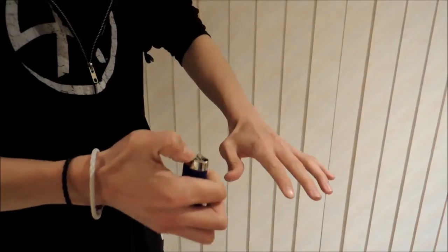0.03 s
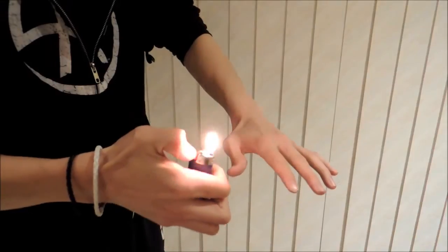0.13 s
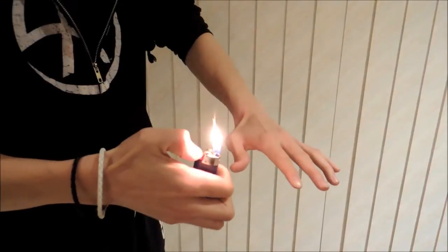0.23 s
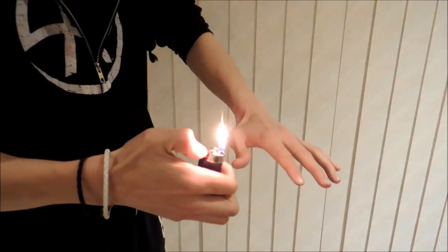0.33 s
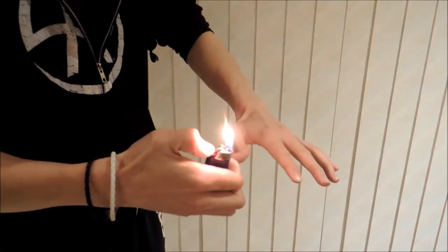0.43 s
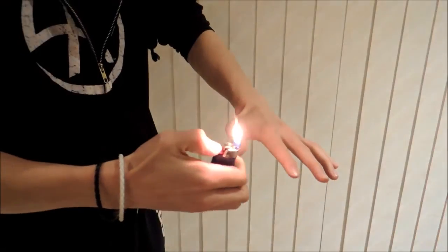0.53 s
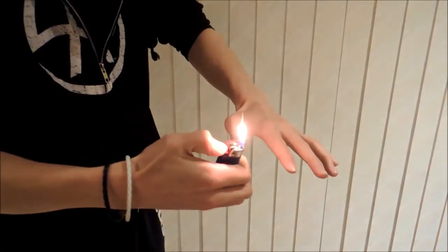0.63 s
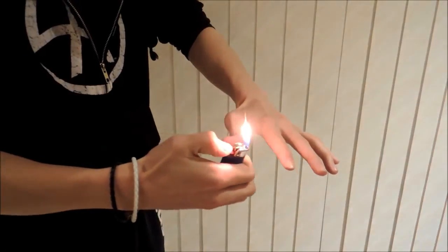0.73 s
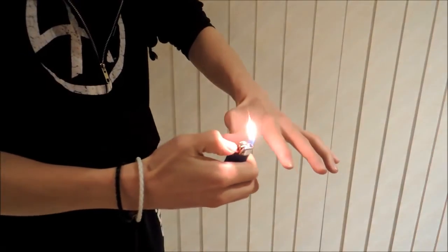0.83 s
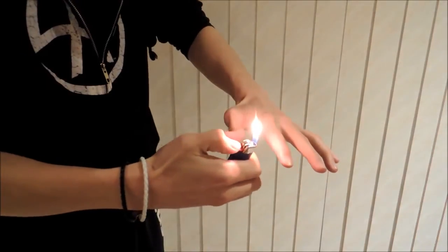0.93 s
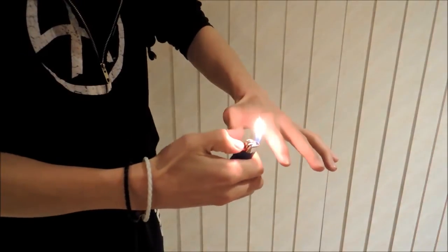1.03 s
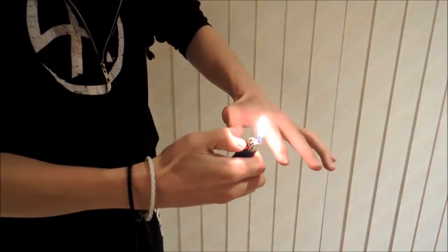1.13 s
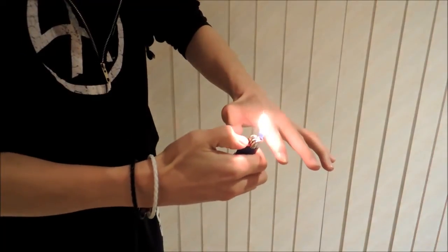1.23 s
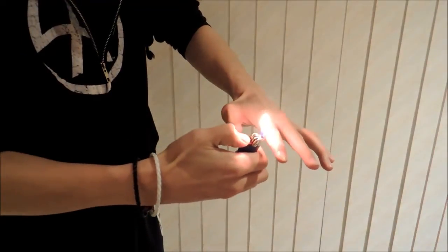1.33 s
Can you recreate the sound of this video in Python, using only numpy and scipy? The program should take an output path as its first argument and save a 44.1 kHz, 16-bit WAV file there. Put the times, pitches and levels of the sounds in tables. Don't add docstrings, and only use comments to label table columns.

```python
import sys
import numpy as np
from scipy import signal
from scipy.io import wavfile

SR = 44100
rng = np.random.default_rng(int(sys.argv[2]) if len(sys.argv) > 2 else 0)


def decibels_to_gain(level_db):
    exponent = np.asarray(level_db, float) / 20
    return 10 ** exponent


def transcribe(u):
    v = np.clip(np.atleast_2d(u).T, -1, 1)
    q = np.round(v * 32767).astype(np.int16)
    wavfile.write(sys.argv[1], SR, q)


N = 61740
LIGHTER_PAN_DB, LIGHTER_SIDE_DB = 0.7, -13


def rms_one(x):
    return x / np.sqrt(np.mean(x ** 2) + 1e-20)


def at_hz(points, hz):
    table = np.array(points)
    return np.interp(np.log(hz), np.log(table[:, 0]), table[:, 1])


def band(x, low_hz, high_hz):
    sos = signal.butter(2, [low_hz, min(high_hz, .45 * SR)], "band", fs=SR, output="sos")
    return signal.sosfilt(sos, x)


def bands(low_hz):
    edges = low_hz * 2 ** np.arange(0, np.log2(15000 / low_hz), 1 / 3)
    return zip(edges, edges * 2 ** (1 / 3))


def drift(rate):
    r = np.exp(-2 * np.pi * rate / SR)
    wander = signal.lfilter([1], [1, -2 * r, r * r], rng.standard_normal(2 * N))
    return rms_one(wander[N:])


def shape(start, rise, hold, fall):
    t = np.arange(N) / SR - start
    return np.clip(t / rise, 0, 1) * np.exp(-np.clip(t - rise - hold, 0, None) / fall)


def ring(x, modes, t60):
    out, r = 0, decibels_to_gain(-60 / (t60 * SR))
    for k, (hz, db) in enumerate(modes):
        w = 2 * np.pi * hz / SR
        mode = signal.lfilter([0, np.sin(w)], [1, -2 * r * np.cos(w), r * r], x + 1e-18)
        out = out + (-1) ** k * decibels_to_gain(db) * mode
    return out


def left_right(mid, side):
    return mid + side * [[1], [-1]]


def strike():
    # start in seconds, level in dB, hood ring and body knock in dB against the wheel ring.
    teeth = [(0.22, -36.5, -4.5, -6.5), (0.2228, -26, -1.5, -10), (0.2257, -24.5, -9, -7),
             (0.2268, -16.5, -4, -8.5), (0.2268, -19, -2, -4.5), (.2284, -17, -2, -3.5),
             (0.2299, -12.5, 0, 2), (0.2304, -14.5, 0.5, -3.5), (0.2311, -19.5, 2, 5.5),
             (0.2328, -29, 3, 1.5), (0.2337, -18.5, 8.5, 6), (.2350, -23, -7.5, 5), (.2360, -20, 1.5, 4),
             (0.2371, -32.5, -0.5, -3.5)]
    # frequency in Hz, level in dB.
    wheel_modes = [(8230, 4), (8570, 3.5), (7357, 1.5), (6400, -9), (9840, -11.5)]
    # frequency in Hz, level in dB.
    hood_modes = [(10600, 1), (11300, 4), (12000, 4.5), (12900, 6), (13500, -1)]
    # frequency in Hz, level in dB.
    body_modes = [(820, -22), (1250, -20), (2100, -25), (2920, -15.5), (4400, -24.5)]
    run_up_s, run_up_end_s, run_up_db, run_up_db_per_s = .2180, .226, -21.5, 3496
    t = np.arange(N) / SR
    grit = rng.standard_normal((2, N)) * decibels_to_gain([[-10], [-11.5 + LIGHTER_SIDE_DB]])

    run_up = decibels_to_gain(run_up_db + np.clip(run_up_db_per_s * (t - run_up_end_s), -80, 0))
    run_up = run_up * (t > run_up_s) * (t < run_up_end_s)
    wheel, hood, body = run_up, run_up, run_up
    for start, db, hood_db, body_db in teeth:
        burst = decibels_to_gain(db) * shape(start, 0.00048, 0, 0.00051)
        wheel = wheel + burst
        hood = hood + decibels_to_gain(hood_db) * burst
        body = body + decibels_to_gain(body_db) * burst

    wheel_ring = ring(wheel * grit, wheel_modes, .005)
    hood_ring = ring(hood * grit, hood_modes, .003) * decibels_to_gain([[0], [5.5]])
    body_ring = ring(body * grit, body_modes, .004)
    rasp = decibels_to_gain(11) * band(body * grit, 4200, 15000)
    return wheel_ring + hood_ring + body_ring + rasp


def thumb_knock():
    knock = (np.arange(N) == int(.2294 * SR)) * 1.0
    thud = ring(knock, [(802, -15.5)], 0.0065)
    pane = ring(knock, [(1356, -46)], .65) * decibels_to_gain(3 * drift(25))
    return thud + pane


def squeal():
    # start in seconds, swell in seconds, hold in seconds, pitch in Hz, peak in dB.
    bites = [
        (.2263, .0012, .0003, 8400, -3.5),
        (.2287, .0009, .0007, 8350, -1.5),
    ]
    fall_s = .00035
    t = np.arange(N) / SR
    out = 0
    for start, swell, hold, hz, db in bites:
        swelling = shape(start, swell, hold, 2 * fall_s) ** 2
        out = out + decibels_to_gain(db) * swelling * np.sin(2 * np.pi * hz * t)
    return out


def puff():
    # frequency in Hz, level in dB per Hz.
    colour = [(1800, -18), (3000, -3), (5000, -5), (8000, -1), (10000, -12), (13000, -6)]
    level_db, patchy_db = -23, 1.5
    white = rng.standard_normal((2, 2, N))
    hiss = 0
    for k, (low, high) in enumerate(bands(1500)):
        level = decibels_to_gain(at_hz(colour, np.sqrt(low * high)) + patchy_db * drift(19.9))
        hiss = hiss + level * band(white[k % 2], low, high)
    return decibels_to_gain([[level_db], [level_db + LIGHTER_SIDE_DB]]) * rms_one(hiss) * shape(.232, 0.00064, 0, 0.027)


def ticks():
    # start in seconds, peak in dB.
    clicks = [
        (.3862, -39),
        (.3980, -34),
        (.4037, -36),
        (.623, -43),
        (.7248, -47),
    ]
    edge = sum(decibels_to_gain(db + 4.5) * shape(start, .0001, 0, 0.00025) for start, db in clicks)
    return band(edge * rng.choice([-1, 1], N), 5600, 17000)


def squeaks():
    # start in seconds, length in seconds, pitch in Hz, level in dB.
    tones = [(.609, .011, 1125, -52), (.629, .03, 1100, -55), (.797, .016, 1365, -57),
             (.835, .02, 1360, -47), (.838, .02, 1525, -55), (1.091, .011, 1660, -56),
             (1.124, .022, 1650, -60), (1.204, .027, 1357, -42.5), (1.234, .065, 1352, -58),
             (.745, .02, 2110, -56), (.760, .022, 1950, -57)]
    edge_s = .003
    t = np.arange(N) / SR
    rough = 1 + .18 * drift(72)
    out = 0
    for start, length, hz, db in tones:
        swell = shape(start, edge_s, length - edge_s, edge_s)
        out = out + decibels_to_gain(db) * swell * np.sin(2 * np.pi * hz * t)
    return np.sqrt(2) * rough * out


def grainy_swells(rows, octaves, fall):
    grain = rng.standard_normal(N) * decibels_to_gain(1.5 * drift(60))
    out = 0
    for start, length, hz, db in rows:
        rub = rms_one(band(grain, hz / 2 ** octaves, hz * 2 ** octaves))
        out = out + decibels_to_gain(db) * shape(start, .004, length, fall) * rub
    return out


def rustles():
    # start in seconds, length in seconds, centre in Hz, level in dB.
    brushes = [
        (.115, .04, 12500, -65),
        (.112, .06, 2300, -61),
        (.178, .04, 3300, -63),
        (.972, .012, 11500, -59),
        (.70, .2, 3200, -62),
        (1.08, .13, 2600, -63),
        (1.32, .07, 2200, -63),
        (1.232, .015, 10000, -66),
        (.59, .07, 2400, -65),
        (.99, .03, 11500, -68),
    ]
    return grainy_swells(brushes, .22, .02)


def creaks():
    # start in seconds, length in seconds, centre in Hz, level in dB.
    strains = [(.597, .012, 2280, -60), (.62, .015, 3400, -62), (.715, .02, 3850, -60),
               (.719, .012, 6900, -62), (.825, .01, 4600, -57), (.84, .025, 4550, -66),
               (.875, .015, 2300, -61), (.885, .02, 3750, -62), (1.117, .014, 2680, -56),
               (1.14, .06, 2550, -62), (1.207, .012, 2480, -60), (.99, .035, 3950, -63),
               (.476, .015, 4300, -63), (.85, .03, 2100, -62), (.522, .015, 1600, -61)]
    return decibels_to_gain(-2.5) * grainy_swells(strains, .06, .004)


def buzz():
    # multiple of the mains frequency, level in dB rms.
    partials = [(1, -73.5), (2, -64.5), (3, -60), (4, -62.5), (5, -51.5), (6, -62.5), (7, -55.5), (8, -62),
                (9, -87), (10, -65.5), (12, -67.5), (14, -75.5), (16, -66)]
    mains_hz, waver_db, pan_db = 60, 1.14, 0.35
    smear = .12
    t = np.arange(N) / SR - .002
    out = 0
    for multiple, db in partials:
        k = round(multiple)
        lag = np.pi / 2 * ((k + 1) % 2) + smear * k ** 2
        level = np.sqrt(2) * decibels_to_gain(db + waver_db * drift(6))
        out = out + level * np.cos(2 * np.pi * mains_hz * k * t - lag)
    return out * decibels_to_gain([[pan_db], [-pan_db]])


def bed(spectrum, patchy_db):
    # frequency in Hz, left-right likeness from 0 to 1.
    likeness = [(60, 0.82), (180, 0.13), (540, 0.73), (1640, 0.48), (4920, 0.35), (14800, 0.16)]
    out, white = 0, rng.standard_normal((2, 2, N))
    for k, (low, high) in enumerate(bands(spectrum[0][0])):
        hz = np.sqrt(low * high)
        if hz < spectrum[-1][0] * 1.1:
            mid, side = band(white[k % 2], low, high)
            alike = np.clip(at_hz(likeness, hz), 0, 1)
            level = decibels_to_gain(at_hz(spectrum, hz) + patchy_db * drift(7.1))
            out = out + level * left_right(np.sqrt(1 + alike) * mid, np.sqrt(1 - alike) * side)
    return rms_one(out)


def air():
    # frequency in Hz, level in dB per Hz.
    colour = [(290, -30.5), (500, -2.5), (652, -11.5), (923, -3.5), (1240, -14), (1610, -10.5), (2420, -15),
              (14000, -22.5)]
    return decibels_to_gain(-52) * bed(colour, patchy_db=2.2)


def rumble():
    # frequency in Hz, level in dB per Hz.
    colour = [(25, 3.5), (45, 1), (80, -6), (150, -5.5), (300, -9), (500, -11), (700, -23.5)]
    return decibels_to_gain(-55) * bed(colour, patchy_db=-0.5)


def room(x):
    # frequency in Hz, time to fall 60 dB in seconds.
    decay = [(400, .15), (1500, .15), (3000, 0.38), (6000, 0.12), (9000, 0.19), (13000, 0.2)]
    wall_s, side_db = 0.0017, -5
    t = np.arange(SR // 2) / SR
    white = rng.standard_normal((2, 2, SR // 2))
    tail = 0
    for k, (low, high) in enumerate(bands(300)):
        dying = decibels_to_gain(-60 * t / at_hz(decay, np.sqrt(low * high)))
        tail = tail + band(white[k % 2], low, high) * dying
    tail = tail * (t > wall_s) / np.sqrt(np.sum(tail[0] ** 2))
    mid, side = signal.fftconvolve(x[None], tail, axes=1)[:, :N]
    return left_right(mid, decibels_to_gain(side_db) * side)


def scene():
    strike_mid, strike_side = strike()
    hiss_mid, hiss_side = puff()
    near = strike_mid + thumb_knock() + squeal() + ticks()
    far = squeaks() + rustles() + creaks()
    pan = decibels_to_gain([[LIGHTER_PAN_DB], [-LIGHTER_PAN_DB]])
    direct = left_right((near + far + hiss_mid) * pan, strike_side + hiss_side)
    reverb = room(decibels_to_gain(-16.5) * near + decibels_to_gain(-14) * far)
    return direct + reverb + buzz() + air() + rumble()


def band_limit(x):
    return signal.sosfilt(signal.butter(12, 15420, fs=SR, output="sos"), x)


def record(dry):
    dip_db = -1.5 * shape(.3, 0.11, 0.11, 0.12)
    x = dry * decibels_to_gain(dip_db)
    top_cut = signal.cheby2(20, 45, 14520, fs=SR, output="sos")
    return band_limit(signal.sosfilt(top_cut, x))


dry = scene()
out = record(dry)
transcribe(out)
```